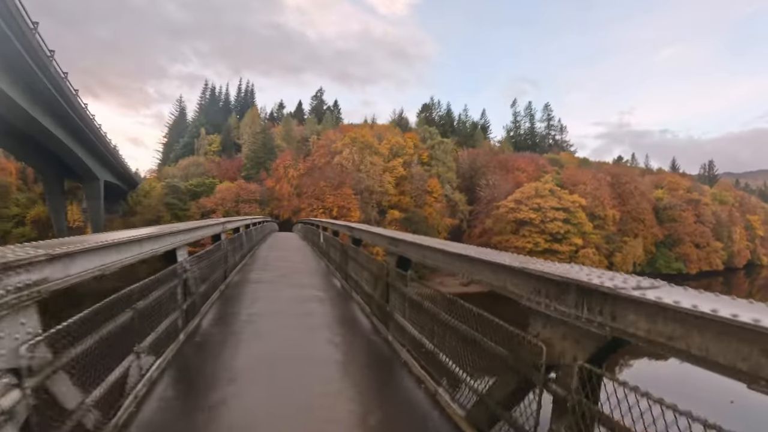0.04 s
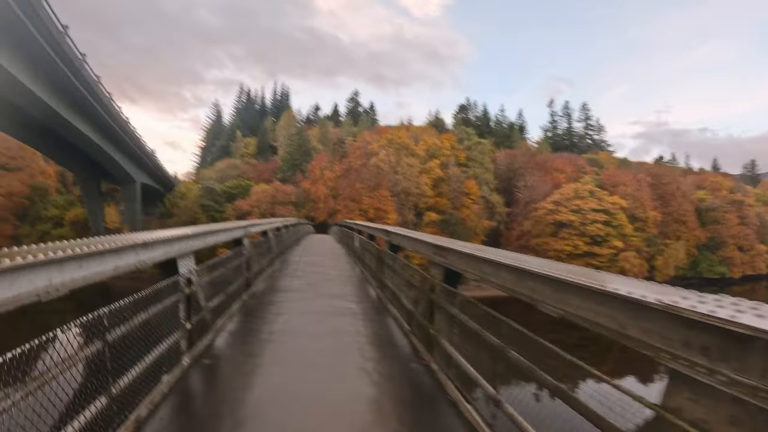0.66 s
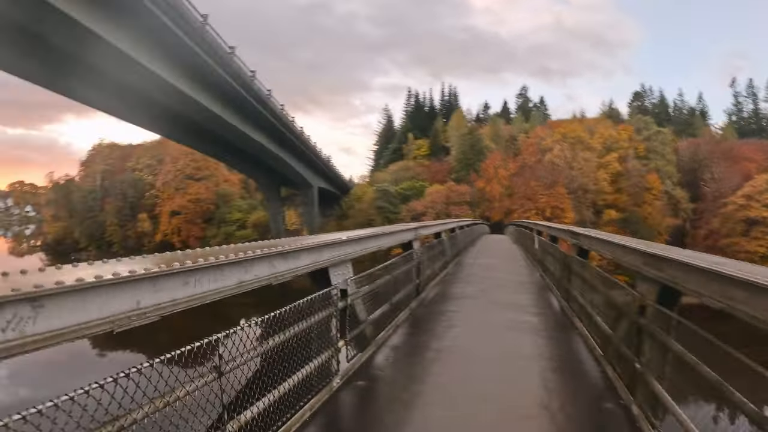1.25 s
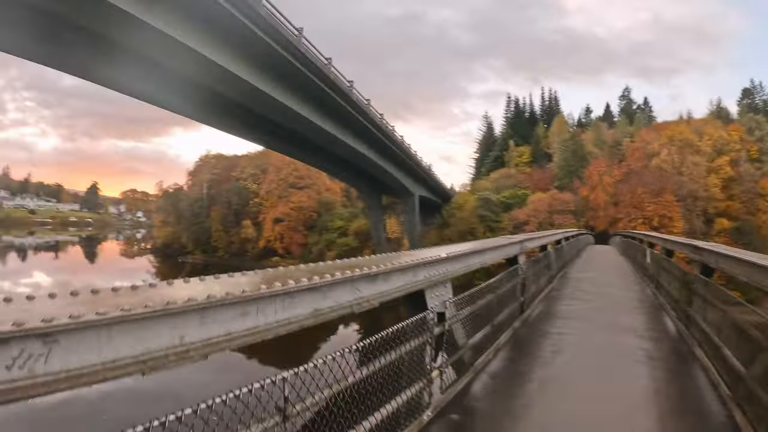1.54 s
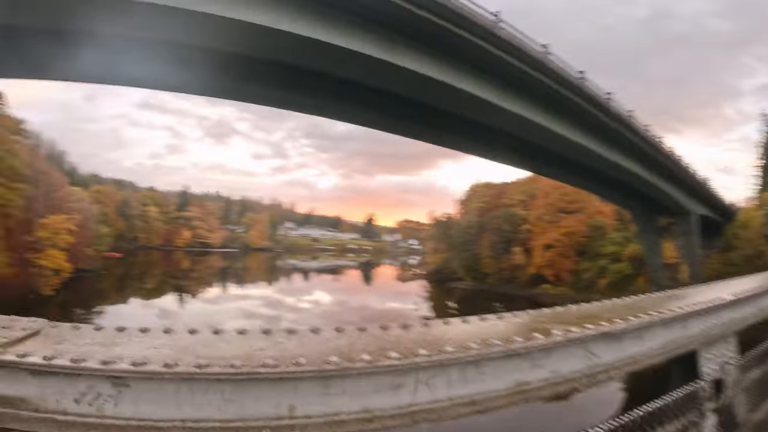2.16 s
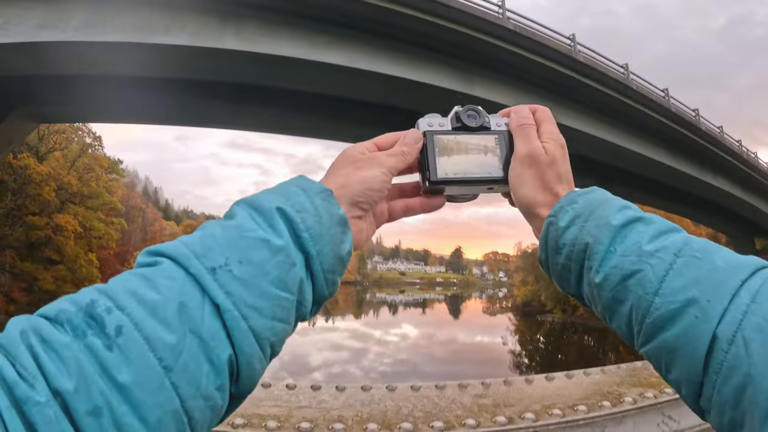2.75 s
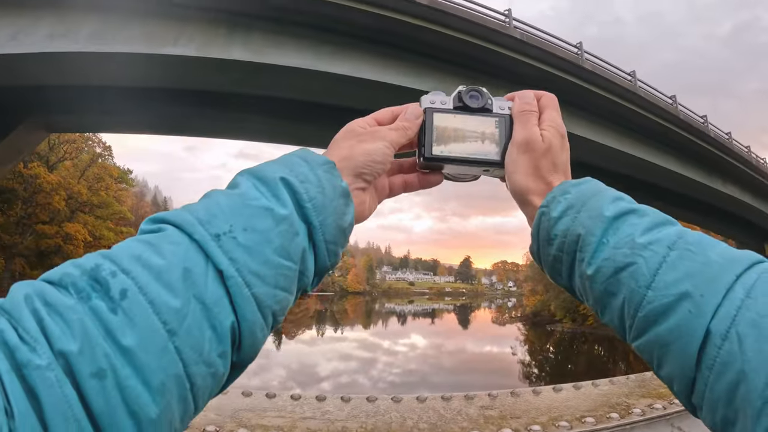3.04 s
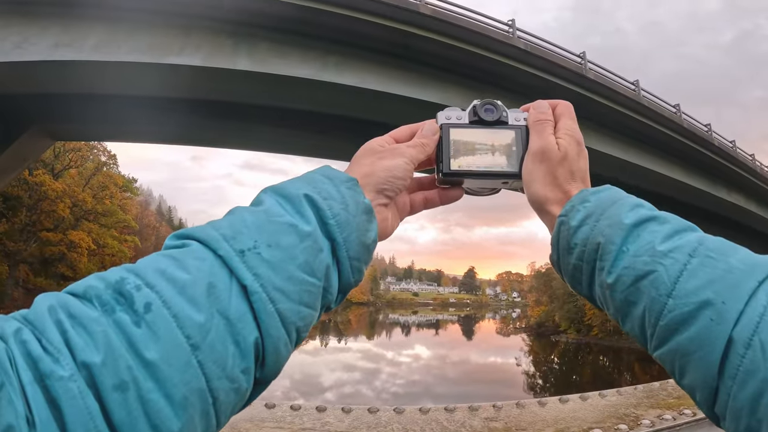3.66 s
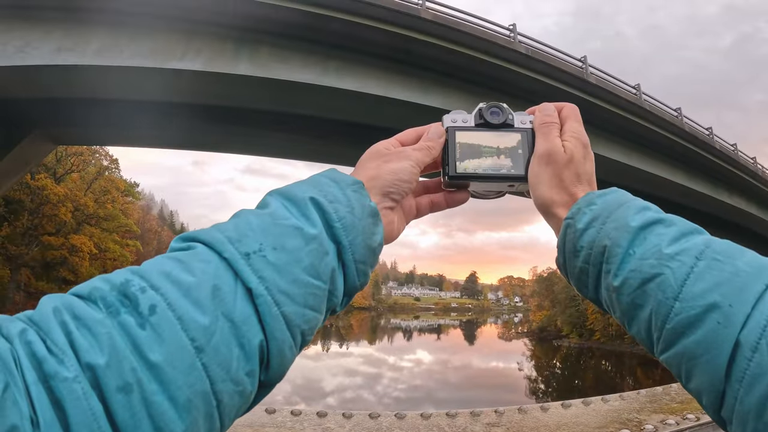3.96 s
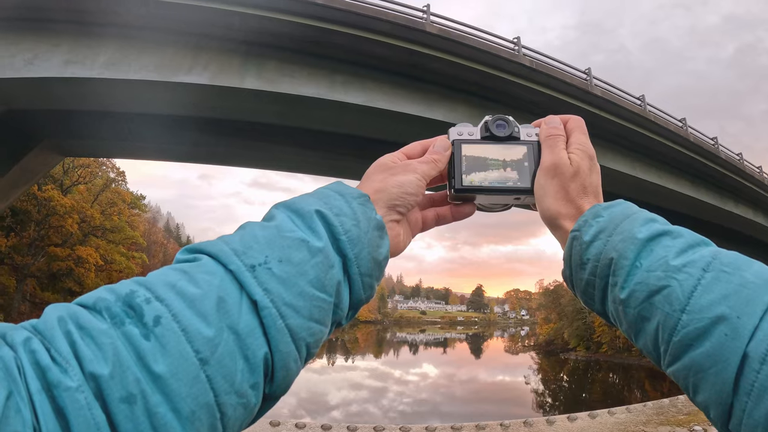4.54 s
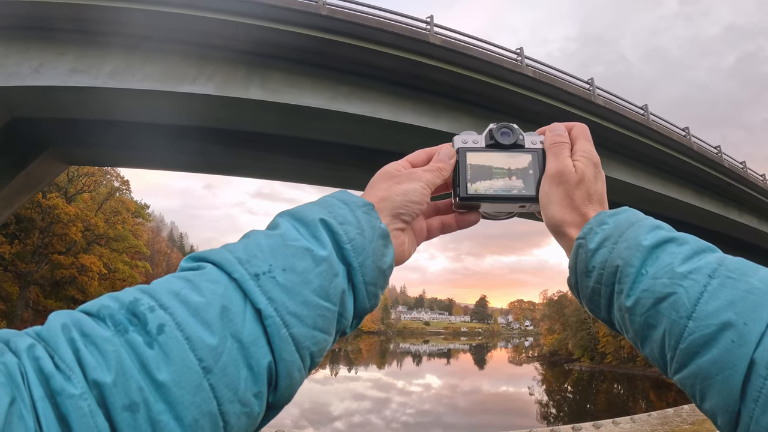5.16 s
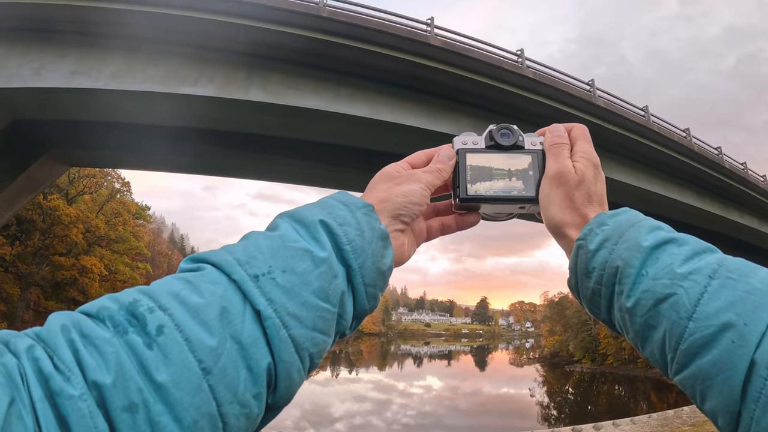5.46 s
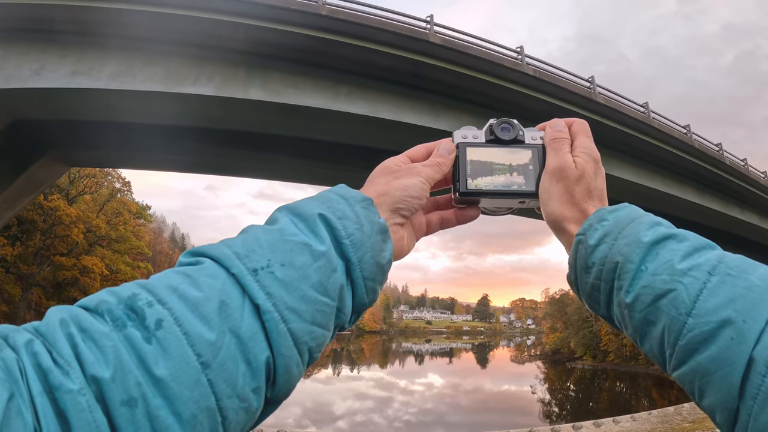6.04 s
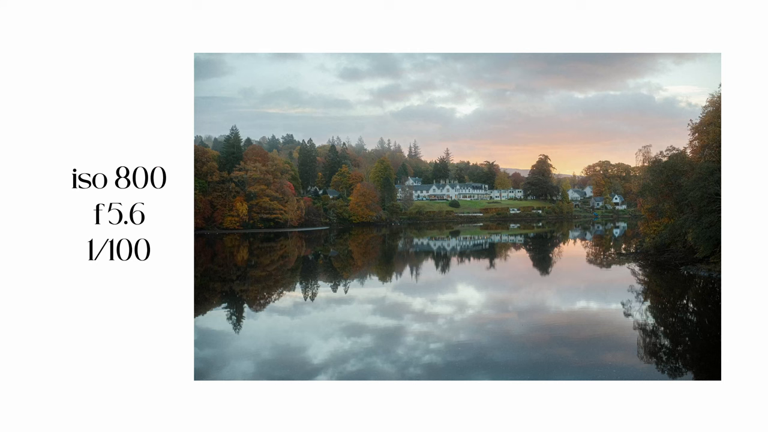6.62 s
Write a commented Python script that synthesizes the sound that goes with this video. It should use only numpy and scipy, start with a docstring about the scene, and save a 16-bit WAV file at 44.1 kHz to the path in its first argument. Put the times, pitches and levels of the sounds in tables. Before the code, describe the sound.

A rush of road traffic grows louder on a bridge above, heard from a footbridge below. Close to the microphone come a few soft footsteps, small gusts of wind, faint jacket swishes and a scuff of gear, with faint bird chirps around. Then cars pass overhead, their tyre whine sliding down over a rumbling deck, until a camera shutter clicks and everything else cuts off abruptly.

```python
"""On a footbridge below a high road bridge, traffic swells: tyres roar and whine, and the deck rumbles.
Wind nudges the microphone, a small bird chirps and a few soft steps make the footbridge ring.
Carried gear taps and nylon jacket sleeves rustle. At the end a camera shutter snaps,
and everything but the camera stops dead."""
import sys
import numpy as np
from scipy import signal
from scipy.fft import rfft, irfft, next_fast_len
from scipy.io import wavfile
from scipy.ndimage import uniform_filter1d

SR = 44100
rng = np.random.default_rng(int(sys.argv[2]) if len(sys.argv) > 2 else 0)


def dump(signal):
    """Clip the signal to [-1, 1] and save it as 16-bit WAV at the path in sys.argv[1]."""
    limited = np.clip(np.atleast_2d(signal).T, -1, 1)
    pcm = np.round(limited * 32767).astype(np.int16)
    wavfile.write(sys.argv[1], SR, pcm)


N = 303937


def amp(db):
    """Turn decibels into a gain."""
    return 10 ** (np.asarray(db) / 20)


def unit(x):
    """Scale a signal to an average (rms) level of 1."""
    return x / np.sqrt(np.mean(x ** 2) + 1e-20)


def clock():
    """The time of every sample, in seconds."""
    return np.arange(N) / SR


def wobble(per_s):
    """A wandering curve through per_s random points a second."""
    points = rng.standard_normal(8192)
    return np.interp(clock() * per_s, np.arange(len(points)), points)


def filtered(x, gain_at):
    """Turn each frequency of x up or down by gain_at(hz)."""
    size = next_fast_len(N + SR // 2)
    return irfft(rfft(x, size) * gain_at(np.fft.rfftfreq(size, 1 / SR)), size)[:N]


def coloured(x, tone):
    """Shape x with a tone table (pitch_hz, relative_db), then scale it to level 1."""
    pitch_hz, db = np.transpose(tone)
    def gain_at(hz):
        return amp(np.interp(np.log(hz + 1), np.log(pitch_hz), db, left=-120, right=-120))
    return unit(filtered(x, gain_at))


def rush(tone, patchy_db):
    """Rushing noise shaped by a tone table, with drifting louder and softer patches."""
    size, hop = 512, 256
    real, imag, patches = rng.standard_normal((3, 2 * N // size + 3, hop + 1), dtype=np.float32)
    patches = uniform_filter1d(patches, size=3, axis=1)  # smooth across pitch
    patches = uniform_filter1d(patches, size=28, axis=0)  # smooth across time
    frames = irfft((real + 1j * imag) * amp(patchy_db * unit(patches)))
    frames *= np.sin(np.pi * np.arange(size) / size)
    overlapped = frames[1:, :hop] + frames[:-1, hop:]
    return coloured(overlapped.ravel()[:N], tone)


def even(noise):
    """Smooth away the chance surges of a noise."""
    return noise / np.sqrt(np.abs(uniform_filter1d(noise ** 2, size=SR // 10)) + 1e-6)


def band(hz, width_hz, count=N):
    """A band of noise around a steady or moving pitch."""
    lowpass = signal.butter(2, min(width_hz / 2, SR / 3), fs=SR, output="sos")
    a, b = signal.sosfilt(lowpass, rng.standard_normal((2, count), dtype=np.float32))
    phase = (2 * np.pi * np.cumsum(hz * np.ones(count)) / SR).astype(np.float32)
    return unit(a * np.cos(phase) + b * np.sin(phase))


def ringing(start_s, hz, width_hz):
    """Half a second of noise around one pitch."""
    return np.pad(band(hz, width_hz, count=SR // 2), (round(start_s * SR), N))[:N]


def strike(start_s, fade_s, attack_s):
    """A gain that jumps up, then falls by 60 dB in fade_s."""
    t = np.arange(int(2 * fade_s * SR)) / SR
    shape = (1 - np.exp(-t / attack_s)) * amp(-60 * t / fade_s)
    return np.pad(shape, (round(start_s * SR), N))[:N]


def swells(rows):
    """A gain with one smooth hump for each row (peak_s, level_db, half_length_s)."""
    t = clock()
    coarse = t[::64]
    power = sum(amp(db) ** 2 * np.exp(-((coarse - s) / half) ** 2) for s, db, half in rows)
    return np.interp(t, coarse, np.sqrt(power + 1e-20))


def arrival(far_db, near_db, halfway_s, rise_s):
    """A gain that climbs smoothly from its far level to its near level and stays there."""
    nearness = 0.5 * (1 + np.tanh((clock() - halfway_s) / (2 * rise_s)))
    return amp(far_db + (near_db - far_db) * nearness)


def echo(x, fade_s):
    """A blurred echo with about as much energy as x."""
    t = np.arange(SR) / SR
    tail = rng.standard_normal(SR) * amp(-60 * t / fade_s)
    return signal.fftconvolve(x, tail / np.linalg.norm(tail))[:N]


# The tone of the traffic's low body, tread roar and hiss: pitch_hz, relative_db
BODY_TONE = [(70, -29), (130, -6.5), (175, -2), (260, 2), (330, -0.1), (430, -3), (600, -3.5), (800, -7.5),
             (1100, -18), (2000, -50)]
TREAD_TONE = [(400, -29), (700, -2.4), (900, 3), (1150, -2.5), (1450, -5), (1900, -26.5), (3000, -43.5)]
HISS_TONE = [(900, -24.5), (1500, 5.5), (2000, 3), (2600, -5), (3300, -10), (4200, -15), (5600, -21),
             (6500, -26.5), (7700, -28), (8800, -39), (10500, -41.5), (11500, -57.5), (15500, -54.5)]
def traffic():
    """Many tyres blend overhead: the tread roar swells first, then the low body and the hiss."""
    body = arrival(-50.5, -36, halfway_s=2, rise_s=0.54) * rush(BODY_TONE, patchy_db=1.0)
    tread = arrival(-55.5, -42.5, halfway_s=1.4, rise_s=0.6) * rush(TREAD_TONE, patchy_db=1.0)
    hiss = arrival(-59.5, -48.5, halfway_s=2, rise_s=0.25) * rush(HISS_TONE, patchy_db=0.9)
    thin_from_s, thin_db_per_s = 5.08, 1.5
    thinning = amp(-thin_db_per_s * np.maximum(clock() - thin_from_s, 0))
    return thinning * (body + tread + hiss)


# The tone of the road bridge's rumble: pitch_hz, relative_db
DECK_TONE = [(8, -8), (20, -1), (38, 3), (55, 2), (75, -5.5), (110, -8.5), (160, -14), (240, -21.5)]
# The boom under the bunch of cars: peak_s, level_db, half_length_s
DECK_BOOM = [(4.2, -36, 1.51)]
def deck_rumble(steady_db=-47.5):
    """The bridge deck rumbles all the time and booms as the cars load it."""
    return np.hypot(amp(steady_db), swells(DECK_BOOM)) * even(rush(DECK_TONE, patchy_db=2.8))


# Puffs of wind: peak_s, level_db, half_length_s
WIND_GUSTS = [(0.05, -45, 0.21), (0.437, -46, 0.095), (.79, -44, 0.11), (1.05, -51, .15), (1.36, -37, 0.11),
              (1.615, -31, 0.11), (1.79, -30.5, 0.061), (1.985, -33, 0.08), (2.18, -34, 0.056),
              (2.27, -35.5, 0.067), (2.594, -42, 0.17), (2.86, -37, 0.079), (2.97, -30, 0.055),
              (3.07, -34.5, .045), (3.2, -35.5, 0.045)]
# Their boomy tone: pitch_hz, relative_db
WIND_TONE = [(12, -12.5), (28, -4.5), (42, 1.5), (55, 3.5), (72, -1.5), (105, -5), (140, -15.5), (240, -19),
             (340, -17.5), (600, -32)]
def wind(uneven_db=0.8):
    """Light gusts bump the microphone in uneven lumps."""
    lumps = amp(uneven_db * wobble(per_s=22))
    return swells(WIND_GUSTS) * lumps * even(rush(WIND_TONE, patchy_db=1.5))


# The bird's notes: start_s, length_s, start_hz, middle_hz, end_hz, relative_db, roughness (0 to 1)
BIRD_NOTES = [(0.034, 0.122, 3850, 4020, 3880, -62.5, .1), (2.051, 0.037, 4500, 6200, 6400, -64.5, 1),
              (2.166, 0.041, 5350, 6170, 5900, -62.5, 1), (2.284, 0.043, 5350, 6190, 6180, -61, 1),
              (2.42, .03, 5400, 6150, 6200, -66, 1)]
def bird():
    """One smooth arched whistle, then quick rough chirps that rise, echoing among the trees."""
    song = np.zeros(N)
    for start_s, length_s, start_hz, middle_hz, end_hz, db, roughness in BIRD_NOTES:
        count = int(length_s * SR)
        progress = np.linspace(0, 1, count)
        quiver = 1 + 0.03 * (middle_hz / 6000) * wobble(1400)[:count]
        hz = np.interp(progress, [0, 0.5, 1], [start_hz, middle_hz, end_hz]) * quiver
        level = amp(db + 2.2 * roughness * wobble(220)[:count]) * np.sin(np.pi * progress)
        song[round(start_s * SR):][:count] += level * np.sin(2 * np.pi * np.cumsum(hz) / SR)
    return amp(-1) * song + amp(-1.5) * echo(song, fade_s=0.45)


# Steps and shuffles: start_s, level_db, brightness_db_per_octave
FOOTFALLS = [(0.071, -34, 8), (.135, -36, 7), (0.758, -34, 5), (1.317, -30, -3), (1.342, -25, 2),
             (1.39, -31.5, 0.5), (1.547, -21.5, -1.5), (2.155, -38.5, 1), (2.766, -25, 4.5),
             (3.289, -26.5, 1), (4.005, -25.5, 4)]
# The notes that the footbridge's floor plate rings at: pitch_hz, relative_db, fade_s
PLATE_NOTES = [(46, -0.5, 0.27), (72, 0, 0.12), (111.2, 1, 0.13), (216, -10, 0.0944), (294.8, -4, 0.12),
               (366.6, -5.5, 0.114), (461, -11, 0.072)]
# The tone of the walkway's thud: pitch_hz, relative_db
THUD_TONE = [(120, -11.5), (220, -6), (310, 0.5), (460, -4), (650, -9.5), (1000, -25.5)]
def footsteps(landing_s=0.0053, brightness_pivot_hz=294, thud_db=-16):
    """Each soft sole lands, rings the floor plate and leaves a short dull thud in the walkway."""
    rings, thuds = np.zeros(N + SR), np.zeros(N)
    t = np.arange(SR // 2) / SR
    landing = (1 - np.exp(-t / landing_s)) ** 2
    hz, note_db, fade_s = np.transpose(PLATE_NOTES)[:, :, None]
    chance = rng.standard_normal((len(FOOTFALLS), 2, len(hz), 1))
    for (start_s, db, brightness), (louder, detune) in zip(FOOTFALLS, chance):
        level_db = db + note_db + brightness * np.log2(hz / brightness_pivot_hz) + 1.3 * louder
        notes = amp(level_db - 60 * t / fade_s) * np.sin(2 * np.pi * hz * (1 + 0.033 * detune) * t)
        rings[round(start_s * SR):][:len(t)] += notes.sum(0) * landing
        thuds += amp(db + thud_db) * strike(start_s, fade_s=0.26, attack_s=landing_s)
    return rings[:N] + thuds * coloured(rng.standard_normal(N), THUD_TONE)


# Swishing folds and sliding sleeves: peak_s, level_db, half_length_s
FOLD_SWISHES = [(.21, -65.5, 0.046), (.53, -73.5, 0.045), (.812, -64.5, 0.022), (1.385, -65.5, 0.034),
                (1.47, -66.5, 0.037), (2.417, -61.5, 0.037), (2.51, -61.5, 0.018), (2.56, -62.5, 0.15)]
SLEEVE_SLIDES = [(.15, -85, 0.1), (.7, -85, 0.58), (1.42, -87, 0.27), (2.17, -83, 0.1), (2.51, -73.5, 0.13),
                 (2.85, -82.5, 0.3)]
# The tone of each: pitch_hz, relative_db
FOLD_TONE = [(800, -29.5), (2500, 10.5), (4500, 3.5), (7500, -5.5), (9500, -17.5), (11300, -19.5),
             (12600, -10), (14000, -23.5), (15700, -21.5)]
SLEEVE_TONE = [(6000, -2.5), (8500, -8.5), (10500, -6), (11400, -9), (12500, -4.5), (13400, -10.5),
               (14200, -22.5), (15700, -24)]
def jacket():
    """Nylon folds crackle in swishes, and the weave whispers evenly as the arms move."""
    grains = rng.standard_normal(N) * amp(2 * wobble(500))
    whisper = coloured(rng.standard_normal(N), SLEEVE_TONE)
    return swells(FOLD_SWISHES) * coloured(grains, FOLD_TONE) + swells(SLEEVE_SLIDES) * whisper


# Ticks and scuffs: start_s, level_db, fade_s, pitch_hz, width_hz
GEAR_TAPS = [(.15, -66.5, .03, 7000, 6000), (.7955, -55.5, 0.045, 5130, 1900),
             (.799, -61.5, 0.017, 8000, 9000), (.8385, -48, 0.013, 3400, 2400), (.84, -61, 0.2, 2900, 1300),
             (.941, -64, 0.013, 5500, 5000), (1.44, -53.5, 0.08, 2680, 900), (1.444, -60, .018, 4160, 3000),
             (2.418, -52, 0.015, 6000, 7000), (2.485, -35.5, 0.33, 719, 500),
             (2.49, -46.5, 0.32, 2003, 1800)]
def carried_gear():
    """Small hard parts of carried gear tap and scuff together."""
    return sum(amp(db) * strike(start_s, fade_s, attack_s=0.0007) * ringing(start_s, hz, width_hz)
               for start_s, db, fade_s, hz, width_hz in GEAR_TAPS)


# Droning tyres and engines: peak_s, level_db, half_length_s, pitch_hz, width_hz
DRONES = [(1.553, -55, 0.18, 925, 200), (2.22, -45, 0.14, 929, 260), (2.51, -43.5, 0.18, 894, 165),
          (3.02, -41.5, .15, 917.5, 260), (3.96, -44, 0.21, 900.4, 170), (4.383, -45, 0.24, 1072, 200),
          (5.147, -45, .16, 824, 150), (5.398, -45.5, 0.27, 255.4, 45), (5.847, -47.5, 0.37, 1125, 260)]
def vehicle_drones(sag_per_s=0.06):
    """Tyre treads and engines drone, sagging in pitch as each vehicle goes by."""
    out = np.zeros(N)
    for peak_s, db, half_s, hz, width_hz in DRONES:
        sag = 1 - sag_per_s * (clock() - peak_s)
        out += swells([(peak_s, db, half_s)]) * band(hz * sag, width_hz)
    return out


# Cars crossing the bridge: overhead_s, half_passing_s, level_db
PASSING_CARS = [(3.13, .62, -55), (4.52, .7, -55), (5.78, .76, -56.5)]
# The whine of a car straight overhead: pitch_hz, width_hz, relative_db
WHINE_BANDS = [(1290, 300, 2.5), (2380, 440, -2.5), (3850, 700, -17.5)]
def tyre_whine(slide_share=0.33):
    """Each car's tyre whine swells unevenly and slides down in pitch as it crosses overhead."""
    out = np.zeros(N)
    for overhead_s, half_s, db in PASSING_CARS:
        position = (clock() - overhead_s) / half_s
        distance = np.hypot(1, position)
        slide = (1 + 0.015 * wobble(7)) / (1 + slide_share * position / distance)
        whine = sum(amp(band_db) * band(hz * slide, width_hz) for hz, width_hz, band_db in WHINE_BANDS)
        in_view = np.exp(-(position / 1.16) ** 2)  # the deck blocks the sound of far cars
        out += amp(db + 0.89 * wobble(11)) * whine * in_view / np.sqrt(distance)
    return out


# Surges of hollow roar: peak_s, level_db, half_length_s
ROAR_SURGES = [(3.0, -49, .12), (3.64, -41.5, 0.19), (4.15, -46.5, .25), (5.1, -39, .24),
               (5.65, -44.5, 0.26), (6.12, -43, 0.2)]
def deck_roar():
    """The deck roars hollowly behind the cars."""
    return swells(ROAR_SURGES) * band(hz=602, width_hz=340)


# Shutter parts hitting each other: start_s, relative_db, fade_s, ring_hz
SHUTTER_SNAPS = [(6.094, -60.5, .04, 7440), (6.1106, -35.5, 0.0091, 4700), (6.1318, -48, 0.015, 2800),
                 (6.1477, -37, 0.011, 7700), (6.169, -37, 0.011, 3400), (6.2102, -45, 0.022, 7200),
                 (6.221, -45.5, 0.065, 3370), (6.2357, -45.5, 0.017, 7380), (6.256, -62, 0.017, 2400),
                 (6.272, -65.5, 0.013, 2400), (6.292, -71, 0.012, 2430)]
# The shutter's drive whirring between snaps: peak_s, level_db, half_length_s
DRIVE_WHIRRS = [(6.098, -66.5, .008), (6.15, -63, 0.038), (6.204, -60, .01)]
# The tone of a snap and of the noise that lingers after: pitch_hz, relative_db
SNAP_TONE = [(700, -3.5), (2200, 11.5), (3400, 9), (4900, 2.5), (6200, -5), (7500, 0), (8600, -8),
             (10500, -12), (11600, -15), (13000, -13), (15700, -20)]
TAIL_TONE = [(110, -4), (230, -1), (600, -9), (1150, -4), (2200, -10), (3400, -12), (5000, -19),
             (7400, -19), (9000, -27), (14000, -34)]
# The notes that the camera body rings at: pitch_hz, width_hz, level_db, fade_s
CAMERA_NOTES = [(2040, 600, -59, 0.11), (2450, 510, -70, .25), (7350, 800, -70, .075),
                (10500, 700, -75, .07)]
def shutter(ping_db=-4.5, ring_start_s=6.24):
    """Blades and levers snap over a faint whirr, each with a brief ping, and the camera rings on."""
    crack = rush(SNAP_TONE, patchy_db=0.5)
    snaps = np.zeros(N)
    for start_s, db, fade_s, hz in SHUTTER_SNAPS:
        ping = amp(ping_db) * np.sin(2 * np.pi * hz * (clock() - start_s))
        snaps += amp(db) * strike(start_s, fade_s, attack_s=0.0005) * (1.05 * crack + ping)
    whirr = swells(DRIVE_WHIRRS) * amp(3 * wobble(450)) * crack
    tail = amp(-59.5) * strike(6.22, fade_s=0.18, attack_s=0.002) * rush(TAIL_TONE, patchy_db=-2.0)
    ring = sum(amp(db) * strike(ring_start_s, fade_s, attack_s=0.002) * ringing(ring_start_s, hz, width)
               for hz, width, db, fade_s in CAMERA_NOTES)
    return snaps + whirr + ring + tail


def scene(stop_s=6.2415, stop_length_s=0.0045):
    """The outdoor sounds play together and stop dead; only the camera carries on."""
    road = traffic() + deck_roar() + vehicle_drones() + tyre_whine() + deck_rumble()
    nearby = wind() + footsteps() + jacket() + carried_gear() + bird()
    heard = np.clip((stop_s - clock()) / stop_length_s + 0.5, 0, 1)
    return (heard * (road + nearby) + shutter())[None]


def record(dry, top_hz=15700):
    """Remove the very highest treble."""
    return filtered(dry[0], lambda hz: hz < top_hz)[None]


dry = scene()
out = record(dry)
dump(out)
```